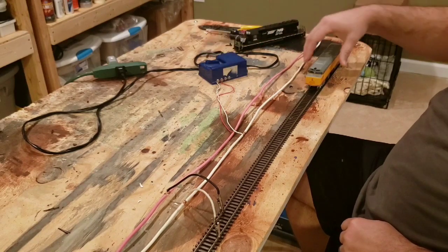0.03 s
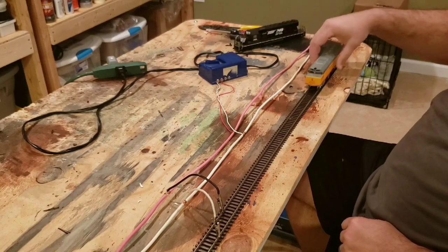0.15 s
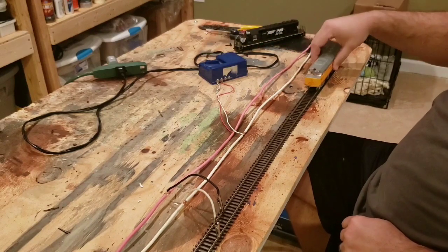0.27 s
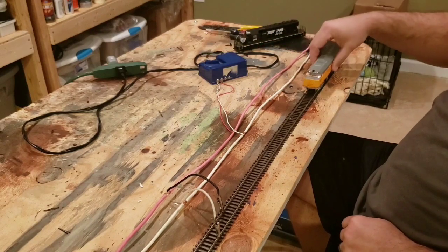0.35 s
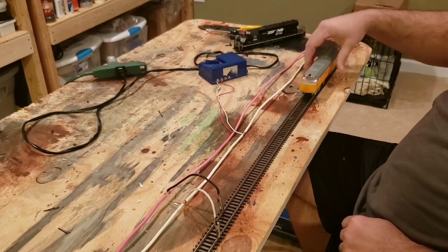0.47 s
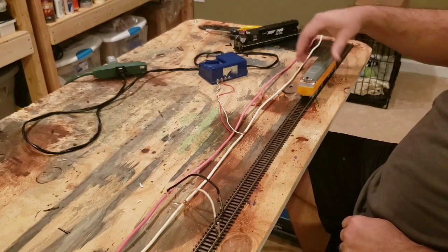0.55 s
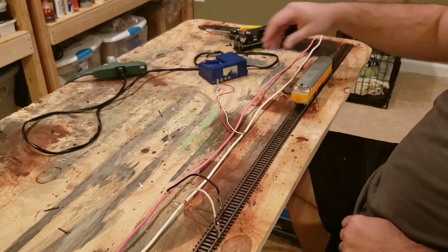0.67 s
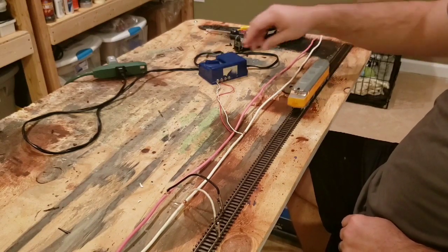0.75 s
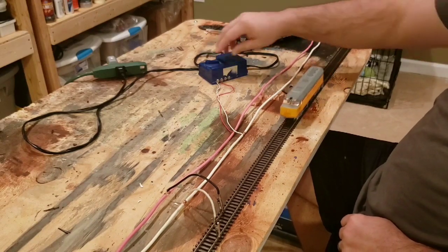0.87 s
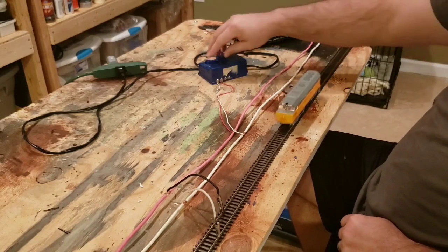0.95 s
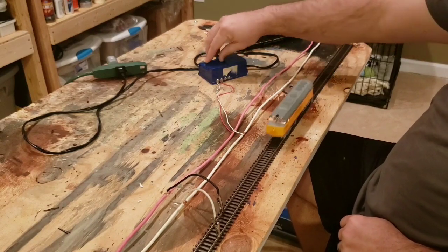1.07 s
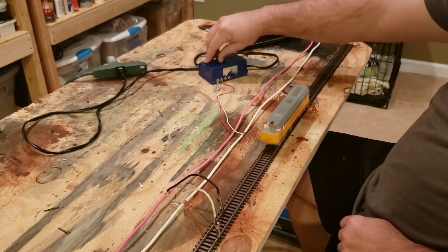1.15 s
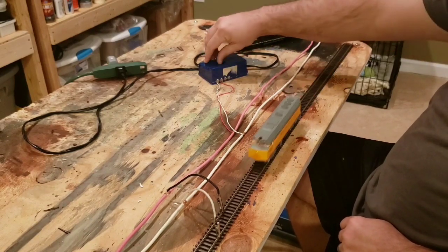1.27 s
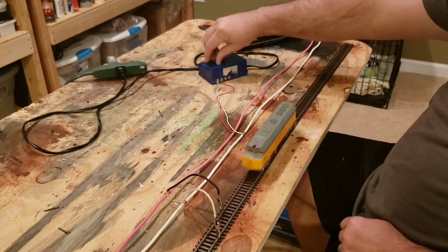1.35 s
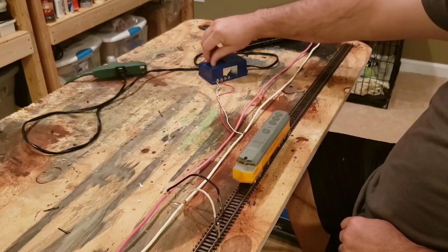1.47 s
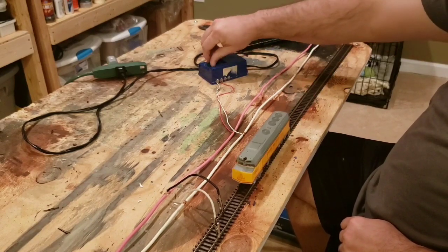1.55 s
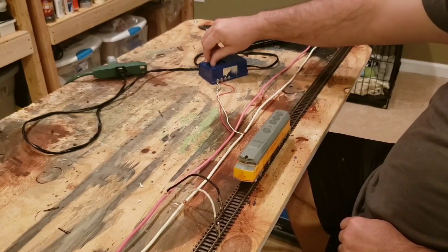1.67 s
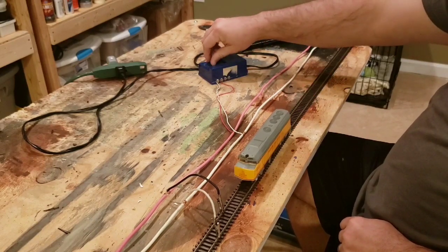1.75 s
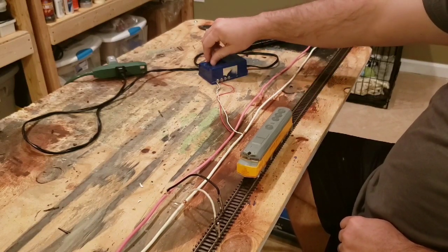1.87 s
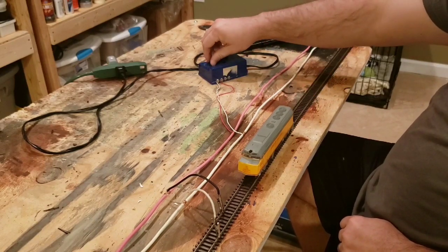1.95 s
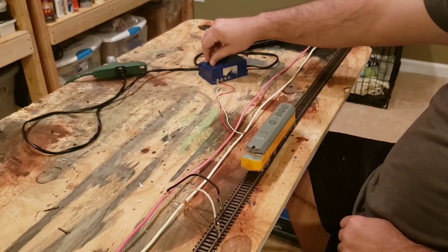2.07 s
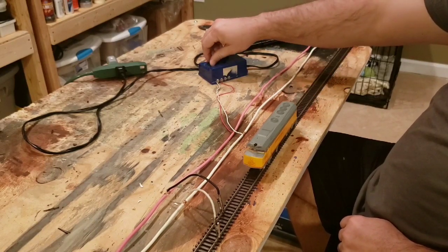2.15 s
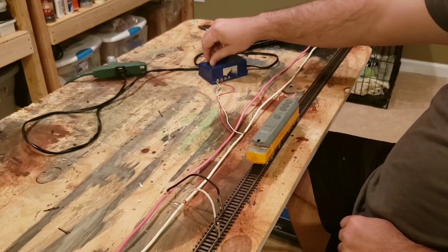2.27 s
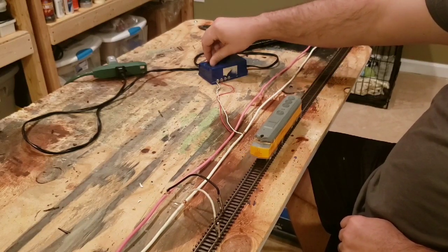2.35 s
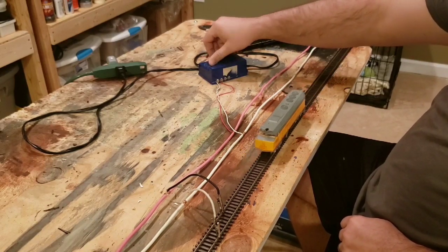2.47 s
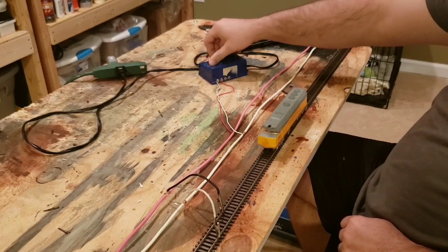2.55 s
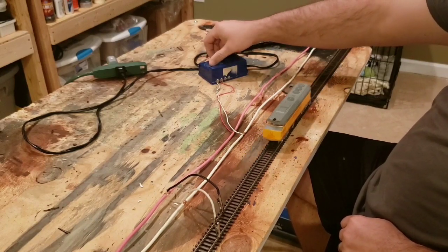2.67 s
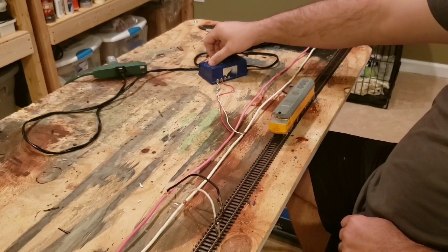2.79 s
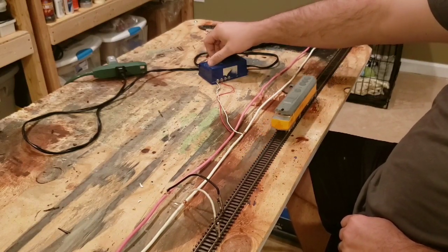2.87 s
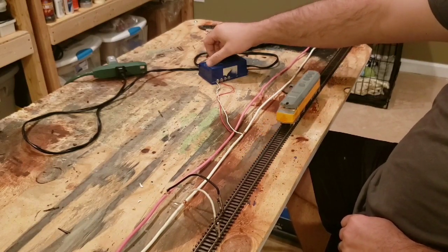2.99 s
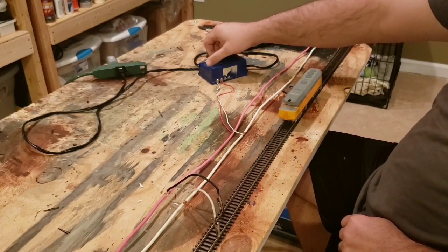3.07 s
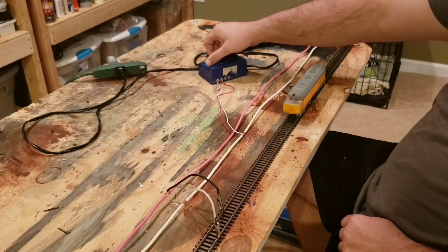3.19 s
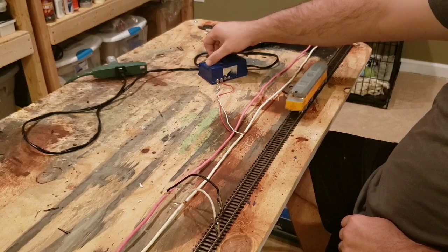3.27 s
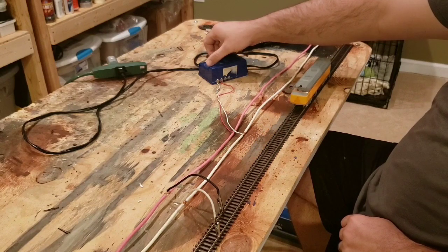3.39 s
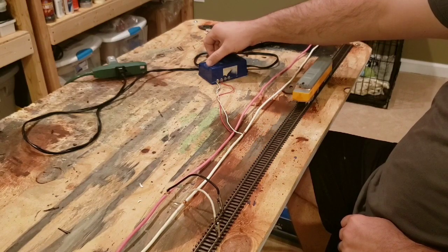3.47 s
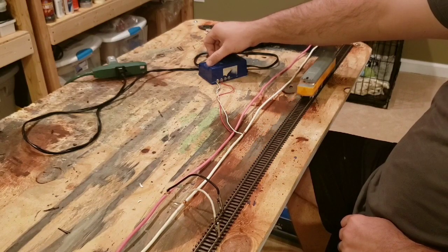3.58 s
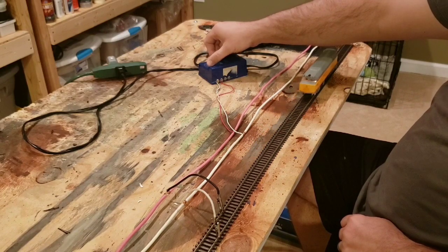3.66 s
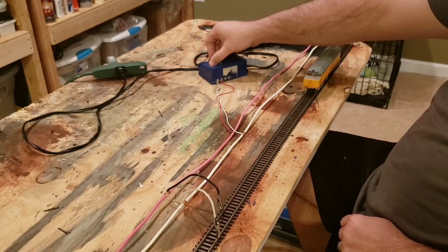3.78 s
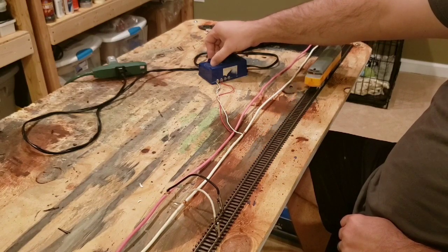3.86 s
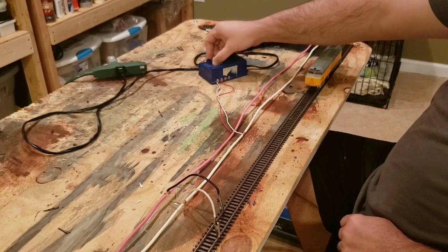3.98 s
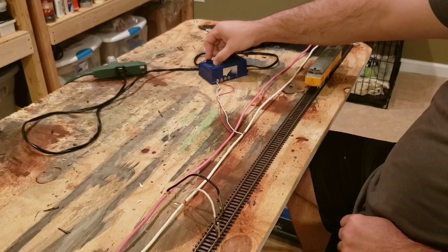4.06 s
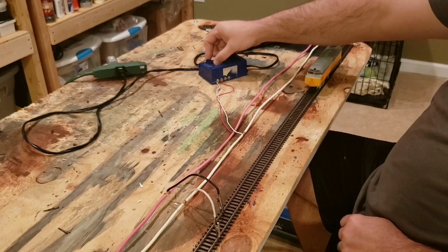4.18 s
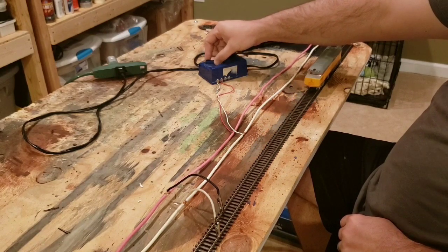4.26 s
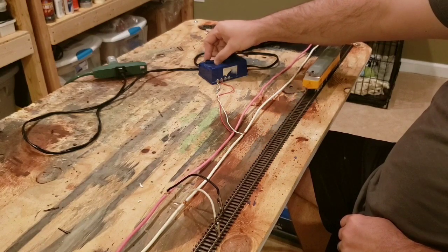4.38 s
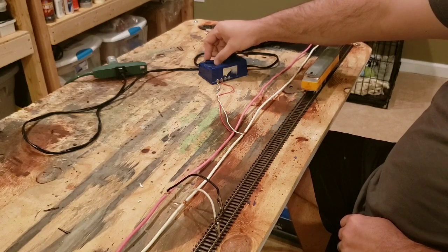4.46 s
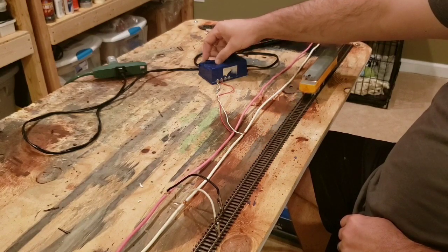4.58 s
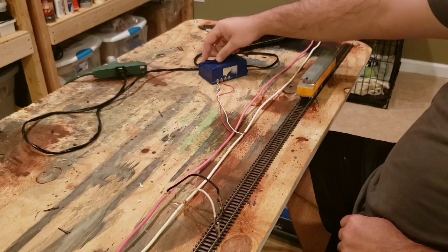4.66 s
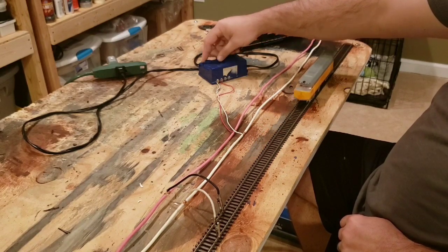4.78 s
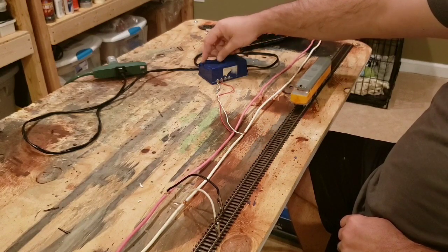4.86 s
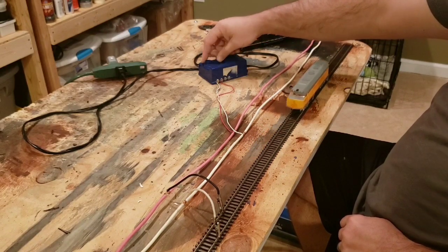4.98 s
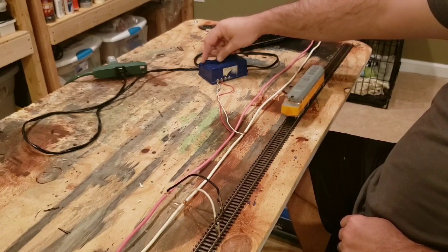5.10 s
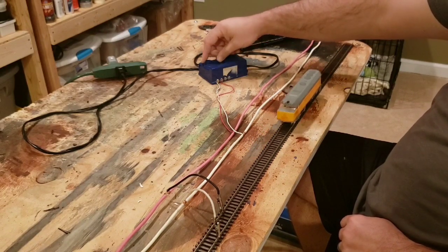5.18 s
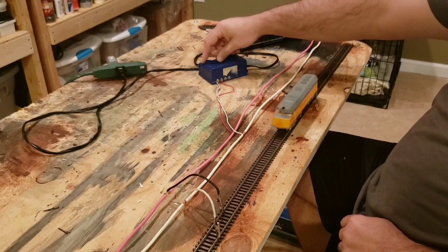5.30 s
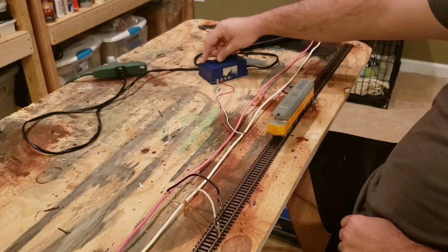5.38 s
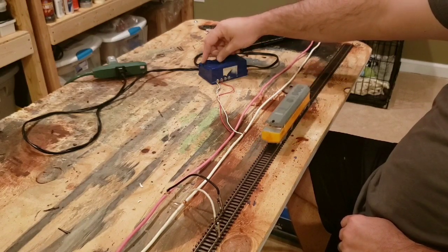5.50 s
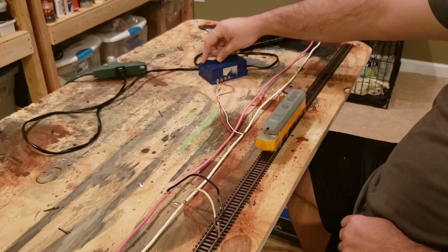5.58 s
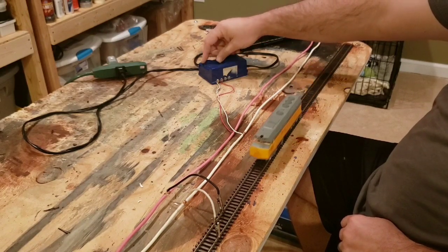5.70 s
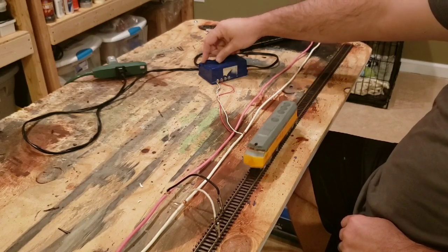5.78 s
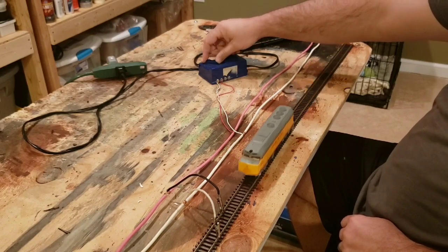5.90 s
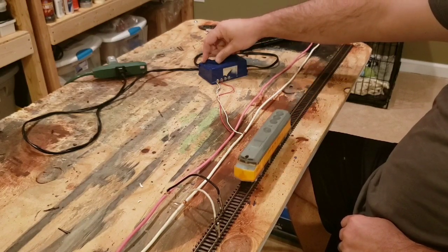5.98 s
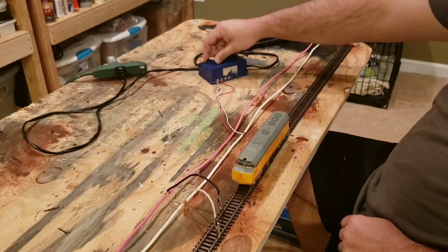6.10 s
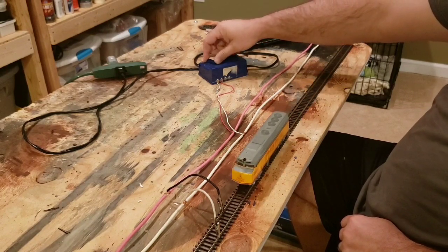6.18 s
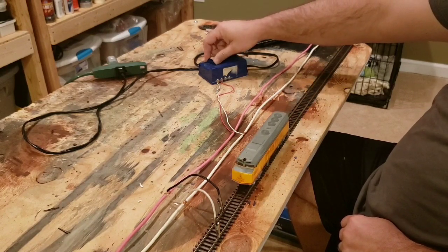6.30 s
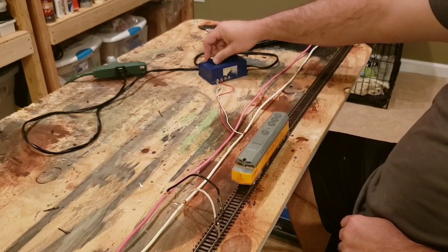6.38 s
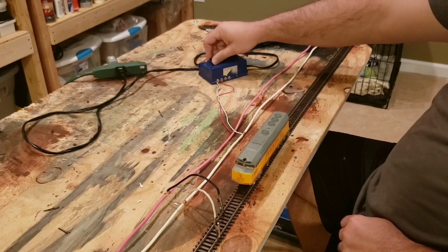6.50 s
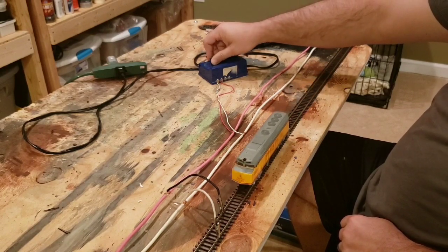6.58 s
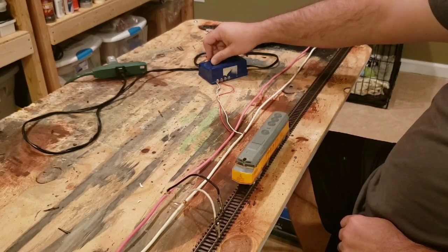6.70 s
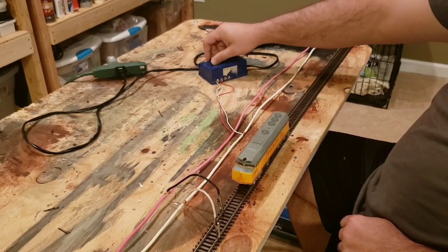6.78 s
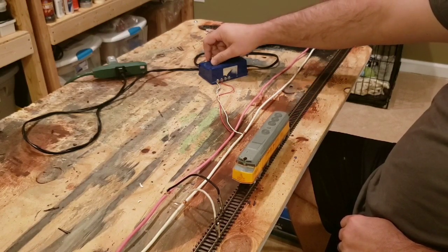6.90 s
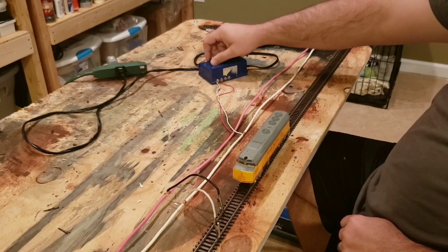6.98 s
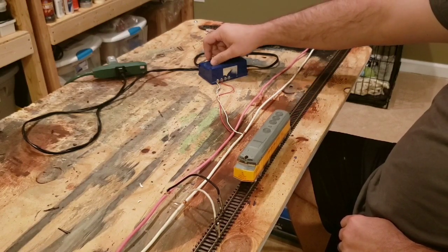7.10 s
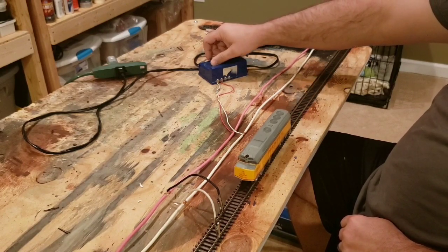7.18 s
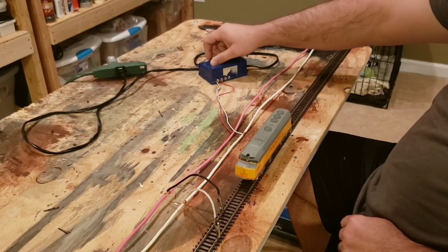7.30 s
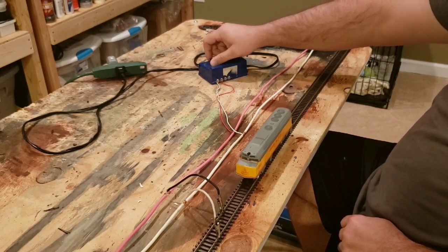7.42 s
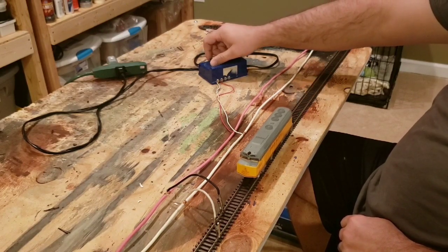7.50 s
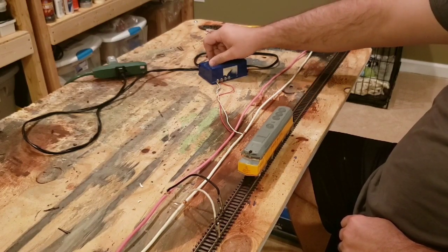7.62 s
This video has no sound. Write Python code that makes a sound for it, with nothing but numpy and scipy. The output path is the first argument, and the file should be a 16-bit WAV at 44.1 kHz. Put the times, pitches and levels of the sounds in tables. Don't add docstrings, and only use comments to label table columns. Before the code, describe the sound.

Low room rumble and faint mains hum come first, then a tiny electric motor whirs up, bright and grainy, with one sharp tick at its fastest. Stuttering gear throbs follow as it turns back, then a steadier run, a short lull, and a third pulsing run. It ends almost silent, with one small scrape and faint creeping clicks. Nearby stereo microphone, small dry indoor space.

```python
import sys
import numpy as np
from scipy import signal
from scipy.fft import rfft, irfft, next_fast_len
from scipy.io import wavfile
from scipy.ndimage import uniform_filter1d, map_coordinates

SR = 44100
rng = np.random.default_rng(int(sys.argv[2]) if len(sys.argv) > 2 else 0)


def wav_record(signal):
    frames = np.transpose(np.atleast_2d(signal))
    bounded = np.clip(frames, -1, 1)
    quanta = np.round(bounded * 32767).astype(np.int16)
    wavfile.write(sys.argv[1], SR, quanta)


def attenuation_scalar(level_db):
    decades = np.asarray(level_db, float) / 20
    return 10 ** decades


N = 337365
TIME = np.arange(N) / SR
SIZE = next_fast_len(N + SR)
HZ = np.maximum(np.arange(SIZE // 2 + 1) * SR / SIZE, 1)
FRAME, HOP = 512, 128
BIN_HZ = np.fft.rfftfreq(FRAME, 1 / SR)[:, None]
FRAME_S = np.arange(-(-N // HOP) + 1) * HOP / SR


def in_time(rows):
    s, *columns = np.transpose(rows)
    return [np.interp(TIME, s, column) for column in columns]


def at_hz(points):
    hz, value = np.transpose(points)
    return np.interp(np.log(HZ), np.log(hz), value)


def rms_one(x):
    return x / np.sqrt(np.mean(x ** 2) + 1e-20)


def shaped(x, gain):
    return irfft(rfft(x, SIZE) * gain, SIZE)[..., :N]


def causal(level_db):
    cepstrum = irfft(np.log(attenuation_scalar(level_db)), SIZE)
    cepstrum[1:SIZE // 2] *= 2
    cepstrum[SIZE // 2 + 1:] = 0
    return np.exp(rfft(cepstrum))


def drift(rate_hz):
    return rms_one(shaped(rng.standard_normal(N), 1 / (1 + (HZ / rate_hz) ** 2)))


def split_ears(level_db):
    return attenuation_scalar(level_db / 2 * [[1], [-1]])


def frames(x):
    return signal.stft(x, nperseg=FRAME, noverlap=FRAME - HOP)[2]


def joined(spectra):
    return signal.istft(spectra, nperseg=FRAME, noverlap=FRAME - HOP)[1][..., :N]


def diffuse(mid_side):
    # frequency in Hz, left-right likeness (1 = the same).
    likeness = [(60, 0.96), (240, 0.81), (950, 0.00028), (3770, 0.2), (15000, -1.1)]
    alike = np.clip(at_hz(likeness), 0, 1)
    mid = shaped(mid_side[0], np.sqrt(1 + alike))
    side = shaped(mid_side[1], np.sqrt(1 - alike))
    return np.array([mid + side, mid - side]) / np.sqrt(2)


def surges(swells, lull_db):
    s, level_db, length = np.transpose(swells)[:, :, None]
    bells = attenuation_scalar(level_db) * np.exp(-(1.65 * (FRAME_S - s) / length) ** 2)
    return np.interp(TIME, FRAME_S, attenuation_scalar(lull_db) + bells.sum(axis=0))


def room_rumble():
    # middle in seconds, level in dB, length in seconds.
    booms = [(.02, -55, .15), (.26, -50, 0.24), (.43, -43, 0.069), (0.59, -50, 0.14), (0.89, -47.5, 0.17),
             (1.07, -54, 0.068), (1.19, -42, .07), (1.408, -44, 0.096), (1.55, -46.5, 0.11),
             (1.841, -41.5, 0.079), (2.02, -47, 0.059), (2.29, -45, 0.092), (2.7, -55, 0.42),
             (2.895, -51, 0.082), (3.266, -55, 0.074), (3.487, -47, 0.15), (3.778, -48, .08),
             (4.04, -50.5, 0.11), (4.261, -49.5, 0.1), (4.65, -49, 0.47), (5.018, -50, 0.36),
             (5.33, -49.5, 0.23), (5.6, -50, 0.17), (5.91, -45.5, .13), (6.1, -42.5, 0.11),
             (6.326, -44.5, 0.22), (6.75, -43, 0.11), (7.0, -44, 0.22), (7.286, -48.5, 0.29),
             (7.507, -43, 0.063)]
    lumpy = attenuation_scalar(2.06 * drift(15))
    hz = 75.3 + 3.0 * drift(7.8)
    return surges(booms, lull_db=-63.5) * lumpy * np.sin(2 * np.pi * np.cumsum(hz) / SR)


def mains_hum():
    # time in seconds, level in dB.
    hum_level = [(0, -53.5), (.87, -51.5), (1.3, -56), (2.4, -56), (3.3, -58.5), (4.17, -55.5),
                 (4.55, -62.5), (5.41, -53), (6.16, -68), (6.4, -52.5), (7.2, -76), (7.65, -62)]
    hum = 0
    for multiple, level_db in ((1, in_time(hum_level)[0] + 1), (2, -66)):
        wobble = attenuation_scalar(level_db + 2.5 * drift(2.6))
        hum = hum + wobble * np.sin(2 * np.pi * multiple * 119.8 * TIME + 0.79 * drift(1.1))
    return hum


def room_floor():
    # frequency in Hz, level in dB per Hz.
    floor_colour = [(15, -35), (25, -15.5), (45, -20.5), (60, -6.5), (90, -10), (130, -10.5), (170, -16.5),
                    (250, -23), (330, -31), (600, -47.5), (1200, -49.5), (2100, -41), (3000, -55),
                    (8000, -62), (13000, -52.5), (16000, -51.5)]
    # frequency in Hz, left minus right in dB.
    far_balance = [(60, 2), (180, 0), (550, 2.5), (1650, 11.5), (4970, 0), (15000, 0.5)]
    colour = attenuation_scalar(at_hz(floor_colour)) * split_ears(at_hz(far_balance))
    return attenuation_scalar(-54.5) * rms_one(shaped(diffuse(rng.standard_normal((2, N))), colour))


def background():
    return (room_rumble() + mains_hum()) * attenuation_scalar(np.array([[.3], [-.3]])) + room_floor()


def contacts(per_s, spread_db, flutter_db, turn_db):
    # time in seconds, turns per second.
    speed = [(.3, 43), (.8, 130), (1.3, 155), (1.45, 130), (1.72, 10.8), (2.1, 37), (2.5, 49), (2.9, 71),
             (3.6, 71), (4.1, 14.2), (4.4, 34), (4.7, 66.6), (5.1, 76), (5.8, 110), (6.25, 42), (6.4, 11)]
    sizes = attenuation_scalar(spread_db * np.minimum(rng.exponential(1, (2, N)), 5)) * rng.choice([-1, 1], (2, N))
    grit = sizes * (rng.random((2, N)) < per_s / SR)
    turns_per_s = in_time(speed)[0] * (1 + 0.0209 * drift(4.75))
    angle = 2 * np.pi * np.cumsum(turns_per_s) / SR
    turning = np.sin(angle) + 1.74 * np.sin(0.9 * angle)
    return rms_one(grit * attenuation_scalar(flutter_db * drift(130) + turn_db * turning)) / np.sqrt(2)


def swell(rise_s, fall_s):
    # start in seconds, swell in dB, length in seconds.
    throbs = [(0.666, 4, 0.021), (1.134, -0.5, .015), (1.499, 9, 0.068), (1.751, 11, 0.043),
              (1.862, 12, 0.034), (1.975, 10.5, 0.053), (2.067, 11, 0.042), (2.161, 10, 0.027),
              (2.223, 12, 0.027), (2.287, 8.5, 0.02), (2.341, 9, .012), (2.4, 2.5, .023),
              (2.477, 7.5, 0.017), (2.524, 1.5, .015), (2.597, 6.5, 0.012), (2.664, 5, 0.04),
              (2.87, 5, .015), (2.932, 2.5, .031), (3.088, 0, 0.014), (3.146, -2, .023), (3.17, -4.5, 0.16),
              (3.194, 6.5, 0.026), (3.265, 8.5, 0.029), (3.357, 1, 0.012), (3.74, 4, 0.014),
              (3.818, 4.5, 0.023), (4.246, 5, .032), (4.353, 9, 0.014), (4.823, 5.5, 0.024),
              (5.026, 5, 0.011), (5.325, 3, .025), (5.79, 3.5, 0.041), (5.878, 4.5, 0.026),
              (5.958, 4, 0.026), (6.579, 11, 0.13)]
    # first tight spot in seconds, first turn in seconds,
    # shortening in seconds per turn, swell in dB.
    gear_turns = [
        (.979, 0.0502, 0.0014, 4.3),
        (5.142, 0.0697, 0.000089, 4.7),
    ]
    tight_spots = list(throbs)
    for (first, turn, quicker, top_db), count in zip(gear_turns, (7, 8)):
        for k in range(count):
            start = first + k * turn - quicker * k * (k - 1) / 2
            tight_spots.append((start, top_db, 0.023))
    s, top_db, length = np.transpose(tight_spots)[:, :, None]
    t = FRAME_S - s
    gate = (1 + np.tanh(t / rise_s)) * (1 - np.tanh((t - length) / fall_s)) / 4
    return np.sum(top_db * gate, axis=0)


def ticks(decays_s, trims_db):
    # time in seconds, peak in dB, shell ring in relative dB, fizz in relative dB.
    slaps = [(0.3047, -66, -7, 2), (0.3445, -57, -19, -6), (1.1804, -24.5, -16, -4),
             (1.8458, -45.5, -16, -5), (1.5073, -32, -9, 0), (2.012, -49, -1, -8), (2.078, -49, -10, -8),
             (2.182, -42, -8, -6), (2.2237, -41, -6, -11), (2.3424, -41, -4, -11), (2.6631, -41, 3, -3),
             (2.867, -48, -13, -4), (3.1597, -39, -4, -5), (3.362, -35, -24, 7), (3.4972, -38, -21, -5),
             (3.7345, -35, -6, 5), (3.7476, -40.5, 1, 11), (3.9702, -51, -18, 11), (4.356, -59, -14, -7),
             (5.04, -38, -10, -3), (5.174, -37, -12, -3), (5.439, -38, -10, -3), (6.1436, -54, -12, -22),
             (6.4096, -63, -5, -15), (6.6206, -67, -6, -15), (6.6455, -65, -6.5, -15),
             (7.0187, -66, -6, -15), (7.0334, -61, -9, -20), (7.157, -60, -4, -13), (7.3196, -53, -10, -25),
             (7.349, -49.5, -6.5, -19.5), (7.4165, -54, -4, -26), (7.5304, -49.5, -4, -23),
             (7.6252, -53, -6, -22), (7.6424, -52, -30, -16)]
    s, peak_db, shell_db, fizz_db = np.transpose(slaps)
    starts = np.round(s * SR).astype(int)
    levels_db = (peak_db, peak_db + shell_db, peak_db + fizz_db)
    bands_hz = ((2570, 8000), (1070, 2060), (9500, 18000))
    out = 0
    for level_db, band_hz, decay_s, trim_db in zip(levels_db, bands_hz, decays_s, trims_db):
        puffs = np.exp(-np.arange(900) / (decay_s * SR)) * rng.standard_normal((len(s), 900))
        puffs = attenuation_scalar(level_db + trim_db)[:, None] * puffs
        train = np.zeros(N + 900)
        for start, puff in zip(starts, puffs):
            train[start:start + 900] += puff
        band = signal.butter(2, band_hz, "band", fs=SR, output="sos")
        out = out + signal.sosfilt(band, train[:N])
    return out


def body_colour():
    # frequency in Hz, level in dB per Hz.
    whir_tone = [(120, -41.5), (200, -2), (330, -4), (760, -3.5), (1080, -5), (1530, -5), (2290, -4.5),
                 (3620, -0.5), (6000, -2.5), (10100, -3.5), (12200, 2), (14000, -2), (15800, -6.5)]
    # resonance in Hz, width in Hz, lift in dB.
    resonances = [(296, 20, 3), (751, 56, 3), (1300, 58, 2), (1504, 66, 8), (1680, 104, 5.5), (2800, 36, 5),
                  (3720, 300, 2.5), (4200, 430, 2.5), (5110, 580, 2), (6070, 880, 2), (6300, 430, 0.5),
                  (7070, 860, -4.5), (8170, 1500, 4), (15200, 1800, 6.5)]
    colour_db = at_hz(whir_tone)
    for hz, width, lift_db in resonances:
        colour_db = colour_db + lift_db / (1 + (2 * (HZ - hz) / width) ** 2)
    return attenuation_scalar(colour_db) / np.sqrt(np.mean(attenuation_scalar(2 * colour_db)))


def path_power(colour):
    # time in seconds, effort as gear hiss in dB, brush sparking in dB.
    first_run = [
        (.335, -92, 6),
        (0.371, -59, 5),
        (0.459, -48.5, -1),
        (.6, -48.5, 1.5),
        (.9, -43.5, 2),
        (1.2, -43.5, 0),
        (1.33, -40, -1.5),
        (1.49, -49, -0.5),
        (1.58, -47, -3.5),
    ]
    second_run = [
        (1.65, -62.5, -6),
        (1.74, -68.5, -3),
        (1.95, -65, -1),
        (2.2, -56.5, -2),
        (2.38, -50, -2),
        (3.1, -49, 3),
        (3.8, -50.5, 3),
        (4.02, -59.5, 4),
        (4.1, -73, -4),
    ]
    third_run = [
        (4.22, -85.5, -11),
        (4.36, -79, 8),
        (4.43, -63, 4),
        (4.55, -53, -0.5),
        (5.0, -47.5, 2.5),
        (5.38, -48, 1.5),
        (5.76, -45, -0.5),
        (5.99, -53.5, 1),
        (6.19, -56.5, -0.5),
    ]
    creep = [
        (6.24, -68.5, -1),
        (6.34, -85.5, -2),
        (6.501, -87, -1),
        (6.97, -87, 5),
        (7.15, -82, 12),
        (7.3, -78, 3),
        (7.335, -72.5, -6),
        (7.47, -73, -6),
        (7.65, -79, 10),
    ]
    # time in seconds, give in dB.
    table_give = [(.3, -3.5), (.7, 1), (1.5, 2.5), (1.8, -4.5), (2.8, 1), (3.7, 2.5), (4.15, 1.5),
                  (4.6, -1.5), (5.5, 1), (5.9, 0.5), (7.6, -3)]
    # level at cruise in dB, then the shares of effort, of sparking, of throbs, of table give.
    paths = [
        (-47.5, 1.33, 1.07, 0.88, .01),
        (-48, 1.025, 0.026, 0.69, .01),
        (-55, 0.94, -0.65, 0.74, 0.091),
        (-58.5, 0.74, 0.1, 0.41, 0.83),
    ]
    s, effort_db, sparking_db = np.transpose(first_run + second_run + third_run + creep)
    give_db = np.interp(FRAME_S, *np.transpose(table_give))
    throb_db = swell(rise_s=0.0017, fall_s=0.0045)
    below = [1, *(1 / (1 + (BIN_HZ / edge_hz) ** 10) for edge_hz in (9500, 2500, 1000)), 0]
    power = 0
    for k, (cruise_db, follows, sparks, depth, gives) in enumerate(paths):
        run_db = cruise_db + follows * (effort_db + 48) + sparks * sparking_db
        level_db = np.interp(FRAME_S, s, run_db) - 2.5 + depth * throb_db + gives * give_db
        share = below[k] - below[k + 1]
        share = share / np.mean(share * np.interp(BIN_HZ, HZ, colour ** 2))
        power = power + share * attenuation_scalar(2 * level_db)
    return power


def patches(wide_hz, long_s):
    rows = BIN_HZ / wide_hz + 0 * FRAME_S
    columns = FRAME_S / long_s + 0 * BIN_HZ
    return rms_one(map_coordinates(rng.standard_normal((400, 800)), [rows, columns], order=1, mode="wrap"))


def changing_ring():
    # middle in seconds, length
    # in seconds, Hz, width in Hz, lift in dB.
    body_spells = [(1.557, 0.12, 1300, 530, 6.5), (1.78, 0.089, 4700, 3100, 7.5), (3.9, 0.16, 5300, 500, 5),
                   (2.61, .2, 4300, 270, 1), (3.03, 0.23, 4150, 350, 0), (2.35, .3, 4100, 1000, -4),
                   (1.875, 0.03, 1500, 450, 8.5), (2.18, .05, 1800, 500, 2), (2.245, 0.044, 1600, 460, 3),
                   (2.305, 0.036, 1500, 370, -1), (2.2, .03, 2300, 700, 6), (5.65, .05, 1460, 400, 4),
                   (5.8, 0.045, 1700, 360, 5.5), (5.37, .05, 4600, 1200, 4.5), (5.51, .05, 4000, 1000, 4),
                   (7.33, .04, 8000, 960, 8), (6.7, 0.12, 4100, 660, 11), (5.7, 0.28, 1140, 260, -3),
                   (4.33, 0.25, 5300, 500, 12), (4.58, 0.2, 790, 210, 11.5), (6.045, 0.46, 8280, 600, 8.5),
                   (6.66, 0.13, 2480, 1800, 20.5), (6.64, 0.086, 3940, 500, 14),
                   (6.65, 0.09, 1080, 400, 17), (6.62, 0.18, 7300, 2200, 7), (5.78, .3, 2500, 970, 2),
                   (3.54, 2.3, 1610, 250, 5), (4.5, 1.4, 3030, 310, -4.5), (2.26, 0.9, 8500, 700, 3),
                   (7.02, 0.069, 6300, 2700, 16), (7.8, 0.14, 6800, 600, 11), (7.22, .14, 6500, 560, 12),
                   (7.45, .3, 6460, 650, 5.5), (6, 0.76, 1250, 300, 5), (7.13, 1.2, 4180, 704, 3.5),
                   (7.452, 0.6, 8000, 686, 1)]
    # middle in seconds, length in seconds, Hz, width
    # in Hz, lift in dB.
    further_spells = [(0.596, .2, 1620, 400, 5.5), (1.3, 0.14, 400, 150, -6), (1.8, 0.33, 800, 600, -4),
                      (2.12, .14, 620, 170, 8), (2.95, 0.37, 1150, 200, 5), (3.25, 0.27, 810, 200, -5),
                      (4.05, .2, 1000, 500, -4), (4.43, .05, 1550, 400, 4), (7.4, .5, 1050, 300, -3)]
    ring_db = 1.52 * patches(202.3, 0.2)
    ring_db = ring_db + 1.6 * patches(1394.0, .012)
    for middle, length, hz, width, lift_db in body_spells + further_spells:
        near_pitch = np.exp(-(2 * (BIN_HZ - hz) / width) ** 2)
        near_time = np.exp(-(2 * (FRAME_S - middle) / length) ** 4)
        ring_db = ring_db + lift_db * near_pitch * near_time
    return ring_db


def tail(power, room_db):
    t60_s = 0.12
    keep = attenuation_scalar(-120 * HOP / (t60_s * SR))
    dying = signal.lfilter([0, 1 - keep], [1, -keep], power)
    return attenuation_scalar(room_db) * joined(np.sqrt(dying) * frames(diffuse(rng.standard_normal((2, N)))))


def delayed(x, lag_s):
    return shaped(x, np.exp(-2j * np.pi * HZ * lag_s))


def locomotive():
    # frequency in Hz, left minus right in dB.
    near_balance = [(60, -8), (110, -3), (200, 4.5), (380, 0.5), (700, -2), (1290, 2), (2380, 0),
                    (4400, -7), (8120, -7.5), (15000, -0.5)]
    colour = body_colour()
    power = path_power(colour) * attenuation_scalar(2 * changing_ring()) * (FRAME_S > .3)
    grit = contacts(per_s=9000.0, spread_db=4.0, flutter_db=1.5, turn_db=1.2)
    whir = joined(np.sqrt(power) * frames(grit))
    knocks = ticks(decays_s=(.0013, .004, .0011), trims_db=(4, 12, 3))
    knock_power = np.abs(frames(knocks)) ** 2 * FRAME / 1.5 * attenuation_scalar(-11)
    front, rear = whir[0] + knocks, whir[1]
    left = delayed(front, .0001) + delayed(rear, 0.00015)
    direct = np.array([left, front + rear])
    heard = direct + tail(power + knock_power, room_db=1.52)
    return shaped(heard, causal(20 * np.log10(colour)) * split_ears(at_hz(near_balance)))


def armature():
    # time in seconds, turns per second, level in dB.
    unbalance = [
        (0.7, 136, -57),
        (0.77, 119.7, -54),
        (0.914, 141, -57),
        (1.284, 158, -56),
        (1.376, 150, -50),
        (1.438, 160, -56.5),
        (1.508, 132, -48.5),
        (1.566, 112, -68),
        (1.62, 107, -54),
    ]
    turns, level_db = in_time(unbalance)
    running = (TIME > unbalance[0][0]) * (TIME < unbalance[-1][0]) * 1.
    running = uniform_filter1d(running, size=2000)
    level = running * attenuation_scalar(level_db + 1 + 2.4 * drift(11.0))
    return level * np.sin(2 * np.pi * np.cumsum(turns + 6.25 * drift(14)) / SR)


def table_top():
    # middle in seconds, level in dB, length in seconds.
    table_rings = [(.76, -52, .12), (1.0, -66, 0.23), (1.28, -59, .12), (1.46, -57.5, 0.11), (1.6, -65, .1),
                   (1.94, -66.5, 0.064), (2.39, -63.5, 0.24), (2.76, -64, 0.11), (3.07, -61.5, .12),
                   (3.32, -58, 0.12), (3.55, -62.5, .2), (3.85, -62, 0.29), (4.58, -67, .1),
                   (4.78, -56.5, .1), (5.18, -58.5, .14), (5.5, -58.5, 0.16), (5.95, -64.5, 0.21)]
    level = surges(table_rings, lull_db=-83) * attenuation_scalar(1.7 * drift(12.0))
    return level * np.sin(2 * np.pi * np.cumsum(300 + 4.05 * drift(7.4)) / SR)


def scene():
    return background() + locomotive() + armature() + table_top()


def roll_off(x):
    return signal.sosfilt(signal.butter(12, 16500, fs=SR, output="sos"), x)


def record(dry):
    rounded = .17 * np.tanh(dry / .17)
    finished = shaped(rounded, 1 / (1 + (HZ / 15930) ** 600))
    return roll_off(finished)


dry = scene()
out = record(dry)
wav_record(out)
```